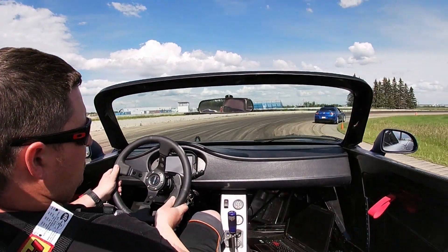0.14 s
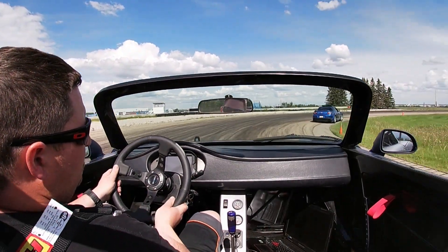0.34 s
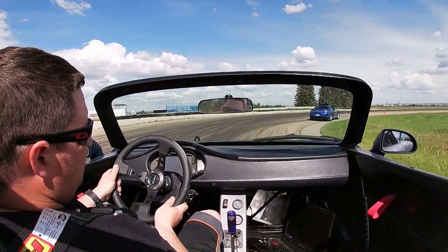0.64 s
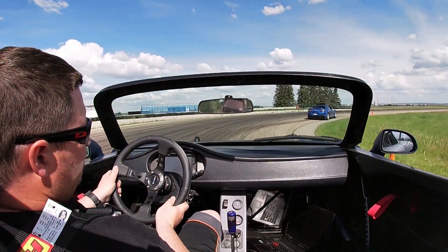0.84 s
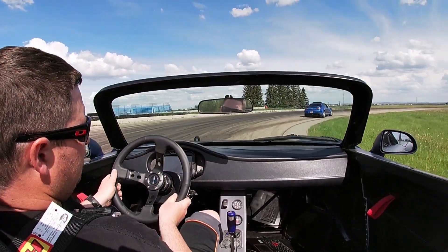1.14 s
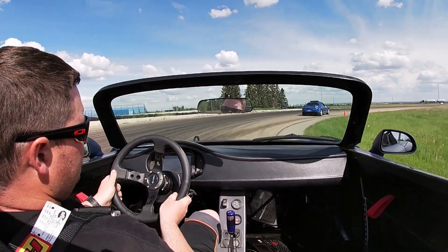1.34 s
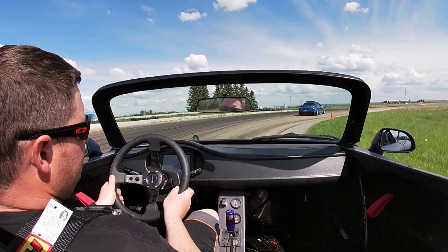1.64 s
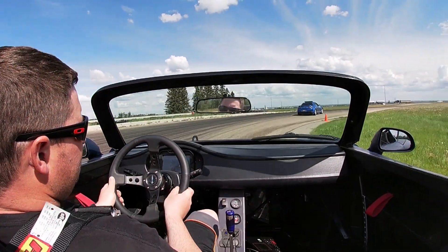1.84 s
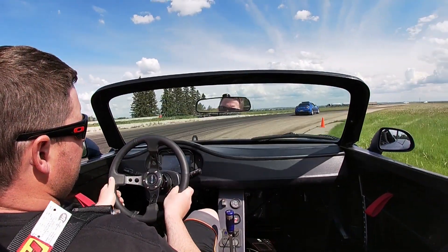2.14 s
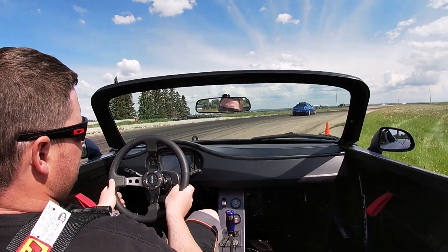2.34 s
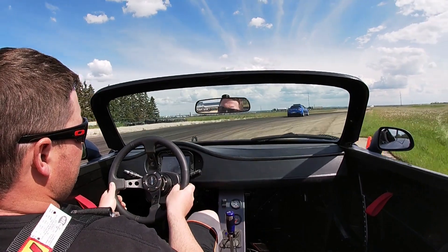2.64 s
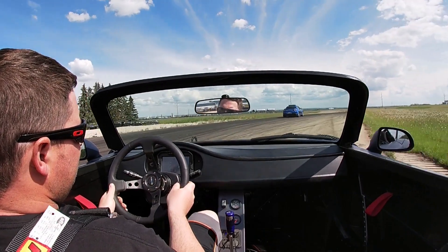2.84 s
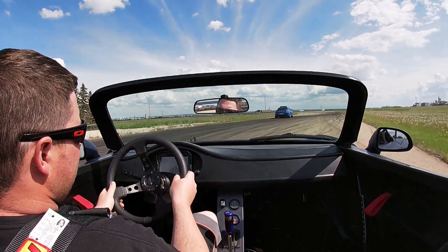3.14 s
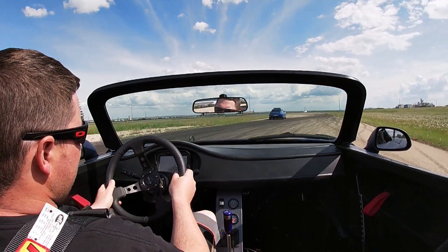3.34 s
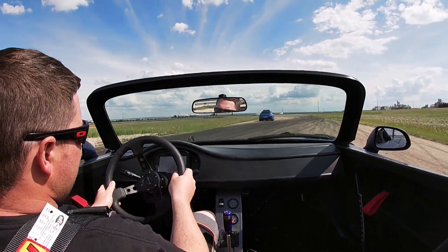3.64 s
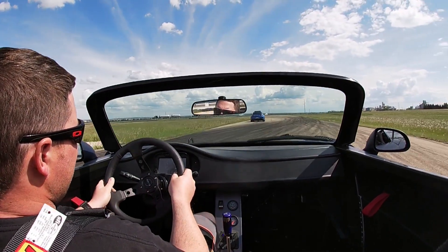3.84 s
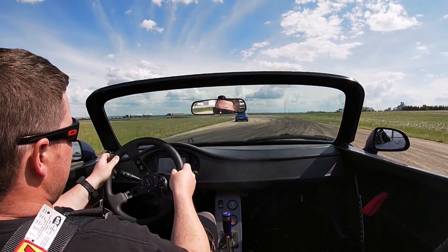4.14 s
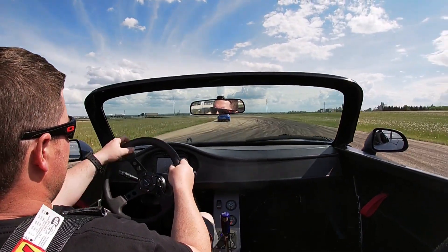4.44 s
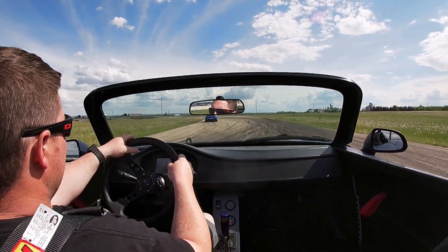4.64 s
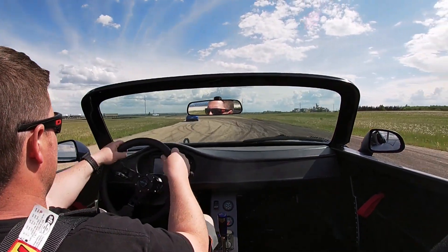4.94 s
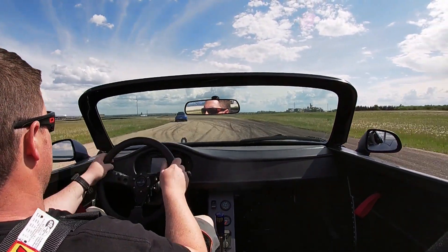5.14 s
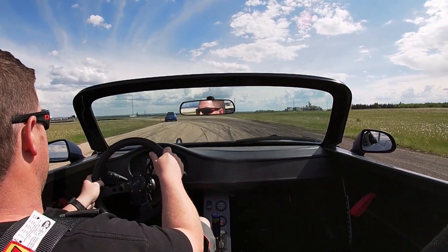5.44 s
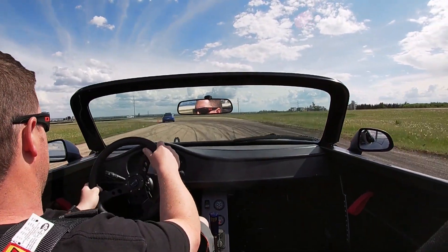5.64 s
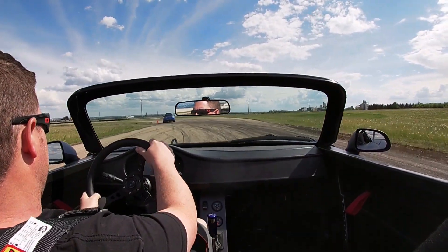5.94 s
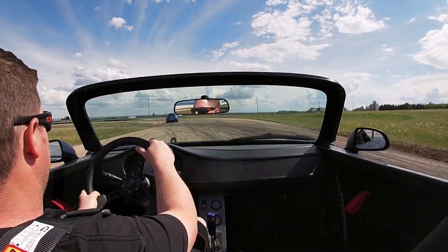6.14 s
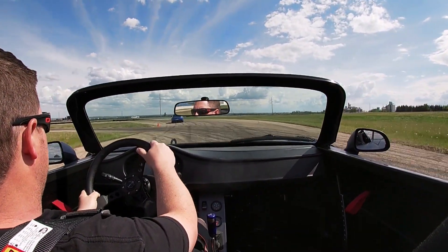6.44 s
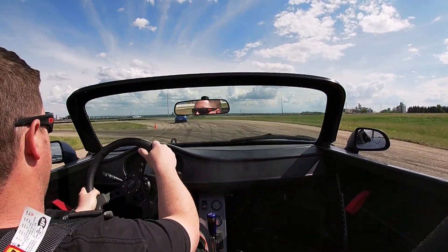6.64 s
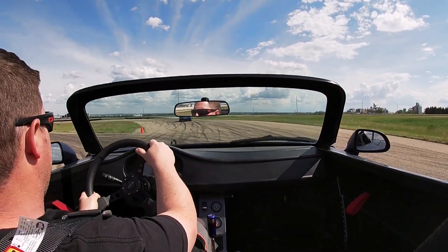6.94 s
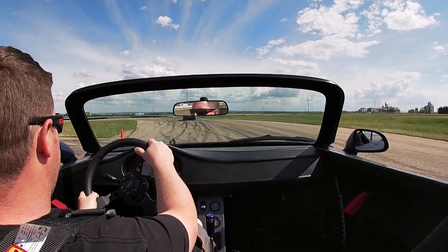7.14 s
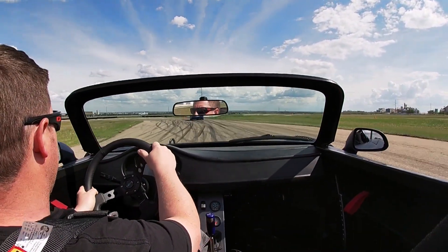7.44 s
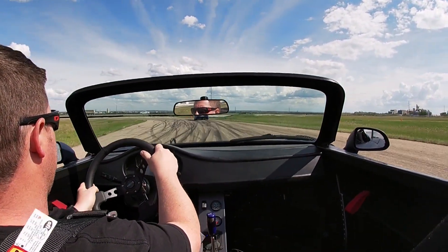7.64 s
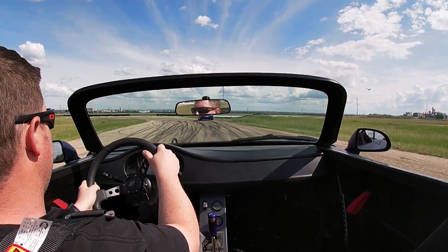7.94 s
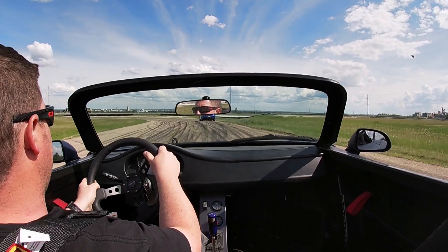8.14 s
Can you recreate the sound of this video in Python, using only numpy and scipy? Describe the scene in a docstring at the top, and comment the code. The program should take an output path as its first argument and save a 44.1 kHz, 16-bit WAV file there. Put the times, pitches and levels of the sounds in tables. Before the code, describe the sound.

An open car with a turbocharged rotary engine pulls through one gear on a race track, heard from beside the driver. The low, raspy exhaust note rises steadily with a faint climbing turbo whistle, over tyre rush and rumbling wind. Near the end the throttle shuts: the exhaust stutters with quick bangs, the boost escapes in a hiss, and the whistle falls as wind buffets the microphone.

```python
"""An open car with a turbocharged rotary engine pulls through one gear on a track, heard from the cockpit.
From the start, exhaust pulses ring the pipe over the rush of air and tyres and the rumble of wind.
As the engine gathers speed, the turbo's whistle climbs and the rush brightens. At seven seconds the
throttle shuts: the exhaust stutters with stray bangs and the boost blows off in a hiss.
Last, the turbo winds down while wind buffets the microphone."""
import sys
import numpy as np
from scipy import signal
from scipy.fft import rfft, irfft
from scipy.io import wavfile
from scipy.ndimage import uniform_filter1d

SR = 44100
rng = np.random.default_rng(int(sys.argv[2]) if len(sys.argv) > 2 else 0)


def bounce(signal):
    """Save signal as a 16-bit WAV file at the path given by the first command-line argument."""
    frames = np.transpose(np.atleast_2d(signal))
    limited = np.clip(frames, -1, 1)
    pcm = np.round(limited * 32767).astype(np.int16)
    wavfile.write(sys.argv[1], SR, pcm)


N = 365588
TIME = np.arange(N) / SR

# firing rate under power: t/s, f/Hz
FIRING_RATE = [(0.0, 54.55), (0.5, 56.23), (1.1, 58.63), (1.5, 60.65), (1.8, 61.83), (2.6, 65.75),
               (3.5, 70.7), (4.4, 76.3), (5.2, 82.24), (6.0, 89.54), (6.6, 95.01), (6.95, 97.39)]
# loudness of the exhaust's bark and boom, dipping briefly early on, then nearly steady: t/s, level/dB
EXHAUST_LEVEL = [(0, -0.5), (.2, -6.5), (.55, -1), (1.07, -3.5), (1.65, -2), (1.85, -.5), (2.5, 0.06),
                 (6.95, -1.53)]
# spectrum of the pulse from an opening exhaust port: harmonic number, level/dB
PORT_HARMONICS = [(1, 11.7), (2, 12.5), (3, 9), (4, 6.5), (5, 5.5), (6, 1), (7, -3.5), (8, -7.5),
                  (9, -13.5), (11, -12), (14, -11), (17, -10.5), (21, -13), (26, -26.5), (34, -24.5)]
# resonances of exhaust and cockpit: f/Hz, bandwidth/Hz, level/dB
PIPE_MODES = [(79, 16.3, -28.5), (125.3, 32.6, -24.5), (221.6, 38.2, -24.5), (284, 50.0, -26),
              (317.5, 28.8, -22), (387, 52, -22.5), (445, 6.3, -35.5), (617, 17, -31), (663.4, 28.7, -25),
              (843, 60, -30), (943.4, 58, -33), (980, 11, -56), (1173, 39, -37), (1581, 110, -35),
              (1600, 48, -60), (1910, 170, -55.5)]
# envelope shared by the exhaust's rasp and jet: t/s, level/dB
RASP_ENVELOPE = [(0.1, -27.5), (0.15, -28.5), (0.71, -28), (0.88, -32), (1.33, -25.5), (1.91, -30),
                 (4.82, -32.5), (5.44, -27.5), (5.86, -29.5), (6.23, -29.5), (6.59, -24.5), (6.93, -28.5)]
# gas leaving the pipe: f/Hz, level/dB
JET_SPECTRUM = [(250, -4), (600, 13), (1000, 9), (1400, -16.5), (1900, -10.5), (2500, -32.5), (3600, -23),
                (4500, -38), (6200, -39), (7300, -40.5), (8800, -40.5), (11000, -59)]
# metallic tick of each firing: f/Hz, level/dB
CLATTER_SPECTRUM = [(2200, -20), (3000, -4.5), (3600, 3), (4500, -9), (6200, -14), (7200, -17), (8700, -11),
                    (10500, -28.5), (12000, -44)]
# resonances of the intake plumbing: f/Hz, bandwidth/Hz, level/dB
INTAKE_RESONANCES = [(1934, 120, 0), (2890, 160, -1), (3133, 310, -3), (3555, 150, 0.5), (4330, 52, -7)]
# the turbo's whistle as it spools up: t/s, f/Hz
WHISTLE_PITCH = [(0, 2370), (.8, 2740), (2, 3700), (4, 5210), (5.5, 6460), (6.4, 7090)]
# envelope shared by rush, intake and whistle: t/s, level/dB
AIR_ENVELOPE = [(0, -47.5), (.6, -45.5), (1.55, -38), (2.2, -38.5), (2.6, -42.5), (4.3, -41.5), (5.7, -40),
                (6.95, -43.5), (8.29, -42)]
# rush of air and tyres: f/Hz, level/dB
RUSH_SPECTRUM = [(400, 14.5), (1000, 9.5), (1700, 8.5), (2000, 5), (2550, -2.5), (3100, -1.5), (3700, -3),
                 (4300, -5.5), (6200, -6.5), (7200, -20.5), (9000, -23), (11000, -33.5), (15000, -48)]
# wind on the microphone: t/s, level/dB
WIND_ENVELOPE = [(0, -24), (1.7, -24.5), (3.3, -28), (4.8, -22.5), (6, -26), (7.35, -21), (7.8, -19.5),
                 (8.29, -19)]
# its rumble: f/Hz, level/dB
WIND_SPECTRUM = [(20, -1.5), (35, -0.5), (70, 2.5), (130, 0), (200, -6.5), (300, -7.5), (450, -15),
                 (700, -20.5), (1000, -22), (1500, -37), (2500, -46), (5000, -80)]
# small sharp ticks: t/s, level/dB, decay time/s, centre f/Hz
TICK_EVENTS = [(0.094, -46, 0.0054, 2800), (1.729, -41.5, 0.0065, 5450), (7.42, -37, 0.013, 2393),
               (7.673, -29, 0.0037, 1980), (7.734, -39.5, 0.03, 2600), (7.98, -36.5, 0.012, 2500),
               (8.071, -39, .015, 2200)]
# single buffets of wind: t/s, level/dB, Gaussian width/s
BUFFET_EVENTS = [(0.095, -14, 0.022), (0.142, -14.5, 0.015), (0.26, -19.5, 0.023), (1.598, -19, 0.024),
                 (7.22, -17, 0.086), (7.44, -17, 0.013), (7.56, -14, 0.01), (7.581, -10, 0.0058),
                 (7.669, -16, 0.0091), (7.694, -16.5, 0.018), (7.759, -16.5, 0.04), (7.837, -19, 0.027),
                 (7.888, -19, 0.0044), (8.005, -21, 0.032), (8.05, -15, 0.0089), (8.096, -14, 0.0063),
                 (8.145, -8, 0.0055)]
# their tearing noise: f/Hz, level/dB
BUFFET_SPECTRUM = [(30, 19), (100, 9.5), (280, 6.5), (550, -2.5), (1000, -10), (1500, -20.5), (2500, -36),
                   (4000, -46), (8000, -88)]
# stray firings after the throttle shuts: t/s, level/dB
STRAY_FIRINGS = [(6.981, -4.5), (7.002, -5), (7.018, -19), (7.087, -6), (7.128, -5), (7.147, -5.5),
                 (7.166, -5.5), (7.176, -9), (7.187, -7), (7.210, -8.5), (7.220, -12), (7.235, -14.5),
                 (7.251, -18), (7.298, -21)]
# hiss of the blow-off valve: f/Hz, level/dB
BLOW_OFF_SPECTRUM = [(1500, -19.5), (3000, 0.5), (5500, 3), (6800, -5.5), (7500, -11.5), (9300, -13),
                     (11500, -30), (14000, -26), (15000, -35)]

MUFFLER_HZ = 488   # the pipe barks below this and rasps above it
BARK_LAG = .3727   # in firing cycles, as are all phases and lags without a unit
LIFT_S, CLOSE_S, OVERRUN_DB = 6.955, .029, -18   # the throttle shuts: when, how fast, drop of the firings
BLOW_OFF_S, VALVE_ATTACK_S = 7.02, .025   # the valve opens: when, how fast


def from_db(db):
    """Amplitude ratio of a logarithmic level."""
    return 10 ** (np.asarray(db) / 20)


def unit_power(x):
    """Normalisation to a mean square of 1."""
    return x / np.sqrt(np.mean(x ** 2) + 1e-20)


def evened(x):
    """Normalisation by the running mean square."""
    return x / np.sqrt(uniform_filter1d(x ** 2, size=8000) + 1e-14)


def in_time(curve):
    """Linear interpolation of a curve at every sample."""
    return np.interp(TIME, *np.transpose(curve))


def drift(corner_hz):
    """Random fluctuation: low-passed noise of unit power."""
    hz = np.fft.rfftfreq(N, 1 / SR)
    return unit_power(irfft(rfft(rng.standard_normal(N)) / (1 + (hz / corner_hz) ** 2), N))


def coloured(x, spectrum):
    """Spectral shaping, scaled to unit power."""
    hz, db = np.transpose(spectrum)
    bins = np.fft.rfftfreq(N, 1 / SR) + 1e-6
    gain = from_db(np.interp(np.log(bins), np.log(hz), db)) * np.minimum(bins / hz[0], 1) ** 2
    return unit_power(irfft(rfft(x) * gain, N))


def below(x, hz, order=4):
    """Zero-phase low-pass filtering."""
    return signal.sosfiltfilt(signal.butter(order, hz, fs=SR, output="sos"), x)


def faded(x, fade_s=.0021):
    """Raised-cosine taper at both ends."""
    return x * np.sin(np.pi / 2 * np.minimum(np.minimum(TIME, TIME[::-1]) / fade_s, 1)) ** 2


def since(s):
    """Ramp function: seconds after a moment, zero before it."""
    return np.maximum(TIME - s, 0)


def shut():
    """Throttle closure, a ramp from 0 (open) to 1 (shut)."""
    return np.minimum(since(LIFT_S) / CLOSE_S, 1)


def firing_hz(sag_hz_per_s=3):
    """The fundamental follows engine speed: it climbs under power and sags on the overrun."""
    return in_time(FIRING_RATE) - sag_hz_per_s * since(LIFT_S)


def octaves_up():
    """Engine speed as a musical interval above its starting value."""
    hz = firing_hz()
    return np.log2(hz / hz[0])


def boom(phase, lead_hz=13.7, db_per_octave=4.5):
    """The fundamental of the exhaust pressure leads the bark in phase, most of all at low revs."""
    swell = np.sqrt(2) * np.cos(2 * np.pi * (phase - BARK_LAG + lead_hz / firing_hz()))
    db = -16.5 + db_per_octave * octaves_up() + .3 * in_time(EXHAUST_LEVEL) - 11 * shut()
    return from_db(db) * swell


def port_pulses(phase):
    """Fourier synthesis of one pulse a firing; its fixed shaft angle makes it narrow as the revs rise."""
    harmonics = np.arange(2, 35)
    cycle = np.linspace(0, 1, 1024)
    amplitudes = from_db(np.interp(harmonics, *np.transpose(PORT_HARMONICS)))
    shape = amplitudes @ np.cos(2 * np.pi * np.outer(harmonics, cycle))
    return np.interp(phase % 1, cycle, shape)


def pipe(x, low_hz, high_hz):
    """Modal superposition: each pipe mode within a band responds as a damped resonator."""
    out = 0
    for hz, width, db in PIPE_MODES:
        if low_hz <= hz < high_hz:
            r = np.exp(-np.pi * width / SR)   # pole radius
            ring = signal.lfilter([1, 0, -1], [1, -2 * r * np.cos(2 * np.pi * hz / SR), r * r], x + 1e-18)
            out = out + from_db(db) * (1 - r * r) / 2 * ring
    return below(out, high_hz, order=8) - below(out, low_hz, order=8)


def bark(phase, strength):
    """Forced resonance: port pulses drive the low pipe modes; the level dips briefly early on."""
    ring = pipe(strength * port_pulses(phase - BARK_LAG), 40, MUFFLER_HZ)
    return from_db(in_time(EXHAUST_LEVEL) - 12.5) * evened(ring)


def scattered(x, delay_s=.00239, reflection=.94):
    """All-pass dispersion: short cockpit reflections smear a pulse and keep its spectrum."""
    delay = np.exp(-2j * np.pi * np.fft.rfftfreq(N, 1 / SR) * delay_s)
    return irfft(rfft(faded(x)) * (reflection + delay) / (1 + reflection * delay), N)


def mellowed(x, edge_hz=1150, onset_firing_hz=70.4, db_per_octave=-22):
    """Pulse overlap at high revs dulls the sound, modelled as a deepening treble shelf."""
    dull = below(x, edge_hz)
    octaves = np.maximum(np.log2(firing_hz() / onset_firing_hz), 0)
    return dull + from_db(db_per_octave * octaves) * (x - dull)


def rasp(phase, strength, lag=.2493, waver_cycles=.008, waver_db=1, waver_hz=6):
    """Forced resonance of the upper pipe modes, wavering in timing and level."""
    pulses = strength * port_pulses(phase - lag + waver_cycles * drift(waver_hz))
    ring = scattered(pipe(pulses, MUFFLER_HZ, 2100))
    db = in_time(RASP_ENVELOPE) - .33 + waver_db * drift(waver_hz)
    return from_db(db) * evened(mellowed(ring))


def jet(phase, puff_db, sharpness=3.5, lag=.32):
    """Jet noise: each firing throws a puff of hissing gas from the pipe."""
    sizes = from_db(np.interp(phase, np.arange(len(puff_db)) + lag, puff_db))
    puffs = sizes * np.exp(sharpness * np.cos(2 * np.pi * (phase - lag)))
    hiss = coloured(puffs * rng.standard_normal(N), JET_SPECTRUM)
    return from_db(in_time(RASP_ENVELOPE) - 13) * mellowed(hiss)


def exhaust(phase, jitter_cycles=.002, uneven_db=.5, rotor_db=.4, puff_spread_db=1.3):
    """Quasi-periodic excitation: two rotors fire in turn, no two firings quite alike."""
    firings = np.arange(int(phase[-1]) + 2)
    timing, force, puff = rng.standard_normal((len(firings), 3)).T
    jittered = phase + jitter_cycles * np.interp(phase, firings + BARK_LAG, timing)
    firing_db = uneven_db * force + rotor_db * (-1) ** firings
    strength = from_db(np.interp(phase, firings + BARK_LAG, firing_db))
    pulsed = bark(jittered, strength) + rasp(phase, strength) + jet(phase, puff_spread_db * puff)
    return boom(phase) + from_db(OVERRUN_DB * shut()) * pulsed


def clatter(phase, db_per_octave=-6, sharpness=3, lag=.35):
    """Impact noise: each firing ticks on the manifold, fainter at high revs and on the overrun."""
    hits = np.exp(sharpness * np.cos(2 * np.pi * (phase - lag))) * rng.standard_normal(N)
    db = -63 + db_per_octave * octaves_up() + OVERRUN_DB * shut()
    return from_db(db) * coloured(hits, CLATTER_SPECTRUM)


def intake(shut_db=7, flutter_db=2):
    """Broadband excitation: turbulence rings the intake modes, louder behind the shut throttle."""
    air = rng.standard_normal(N)
    ring = sum(from_db(db) * signal.lfilter(*signal.iirpeak(hz, hz / width, fs=SR), air)
               for hz, width, db in INTAKE_RESONANCES)
    level_db = in_time(AIR_ENVELOPE) - 13.5 + shut_db * shut() + flutter_db * drift(26)
    return from_db(level_db) * unit_power(below(ring, 5000))


def turbo_hz(half_speed_s=.92):
    """The turbo spools up; after the blow-off, quadratic air drag slows it."""
    return in_time(WHISTLE_PITCH) / (1 + since(BLOW_OFF_S) / half_speed_s)


def turbo(wander=.003, flutter_db=2.5, breath=.5, coast_db=8.5, edge_hz=7300):
    """Random modulation by the airflow makes the compressor's tone breathy; it is louder coasting."""
    angle = 2 * np.pi * np.cumsum(turbo_hz() * (1 + wander * drift(90))) / SR
    whistle = unit_power((1 + breath * drift(120)) * np.sin(angle) + breath * drift(120) * np.cos(angle))
    coasting = np.minimum(since(BLOW_OFF_S) / VALVE_ATTACK_S, 1)
    db = in_time(AIR_ENVELOPE) - 21.5 + coast_db * coasting + flutter_db * drift(14)
    return below(from_db(db) * whistle, edge_hz, order=8)


def rush(phase, throb=.16, treble_hz=4200, brighten_db=10.5):
    """Broadband noise of air and tyres, amplitude-modulated by the engine and brighter under boost."""
    throbbing = 1 + throb * np.cos(2 * np.pi * (phase - .33))
    air = coloured(rng.standard_normal(N) * throbbing, RUSH_SPECTRUM)
    dull = below(air, treble_hz, order=2)
    speed = turbo_hz()
    boost = (speed / speed.max()) ** 2   # pressure goes with speed squared
    treble = from_db(-4.5 + brighten_db * boost ** 2) * (air - dull)
    return from_db(in_time(AIR_ENVELOPE)) * (dull + treble)


def wind(lumpy_db=3.5):
    """Turbulent pressure fluctuation: eddies rumble over the microphone."""
    eddies = rng.standard_normal(N) * from_db(lumpy_db * drift(29))
    return from_db(in_time(WIND_ENVELOPE)) * coloured(eddies, WIND_SPECTRUM)


def ticks(edge_ratio=1.22, attack_s=.0011):
    """Transients: bands of noise with a fast exponential decay are heard as bright cracks."""
    out, white = np.zeros(N), rng.standard_normal(N)
    for s, db, decay_s, hz in TICK_EVENTS:
        band = signal.butter(4, [hz / edge_ratio, hz * edge_ratio], "band", fs=SR, output="sos")
        envelope = np.minimum(since(s) / attack_s, 1) * np.exp(-since(s) / decay_s)
        out += from_db(db) * envelope * unit_power(signal.sosfilt(band, white))
    return out


def buffets(tearing_db=2.5):
    """Intermittent turbulence: the strongest eddies break up in short tearing bursts."""
    eddies = rng.standard_normal(N) * from_db(tearing_db * drift(150))
    envelope = sum(from_db(db) * np.exp(-.5 * ((TIME - s) / width) ** 2) for s, db, width in BUFFET_EVENTS)
    return envelope * evened(coloured(eddies, BUFFET_SPECTRUM))


def impulses(times, sizes):
    """Fractional delay: each impulse is shared between its two nearest samples."""
    at, part = np.divmod(np.clip(times * SR, 0, N - 2), 1)
    at = at.astype(int)
    return np.bincount(at, sizes * (1 - part), N) + np.bincount(at + 1, sizes * part, N)


def pops(crack_db=-12, lag_s=.00312):
    """Impulse response of the pipe: unburnt fuel lights in single bangs, a crack and then a bark."""
    times, db = np.transpose(STRAY_FIRINGS)
    cracks = pipe(impulses(times, from_db(db)), MUFFLER_HZ, 1570)
    barks = pipe(impulses(times + lag_s, from_db(db)), 60, MUFFLER_HZ)
    bangs = barks + from_db(crack_db) * cracks
    return from_db(db.max()) * bangs / np.abs(bangs).max()


def blow_off(spit_db=9, spit_s=.035, hold_s=.37, sag_db_per_s=2.5, release_db_per_s=75):
    """Jet noise of the dumped boost: the valve spits, hisses as the pressure sinks, then closes."""
    age = since(BLOW_OFF_S)
    opening = np.minimum(age / VALVE_ATTACK_S, 1)
    db = -45.5 + spit_db * np.exp(-age / spit_s) - sag_db_per_s * age
    db -= release_db_per_s * since(BLOW_OFF_S + hold_s)
    return opening * from_db(db + drift(25)) * coloured(rng.standard_normal(N), BLOW_OFF_SPECTRUM)


def scene(wobble_cycles=.0056):
    """Superposition of engine, turbo and air at the driver's shoulder."""
    phase = np.cumsum(firing_hz()) / SR + wobble_cycles * drift(6)   # the shaft runs slightly unevenly
    engine = exhaust(phase) + clatter(phase) + intake() + turbo() + pops() + blow_off()
    return faded(engine + rush(phase) + wind() + buffets() + ticks())[None]


def record(dry, cutoff_hz=15200):
    """Soft saturation rounds the highest peaks; a low-pass filter limits the bandwidth."""
    rounded = dry / (1 + dry ** 8) ** (1 / 8)
    return signal.sosfilt(signal.cheby2(12, 70, cutoff_hz, fs=SR, output="sos"), rounded)


dry = scene()
out = record(dry)
bounce(out)
```